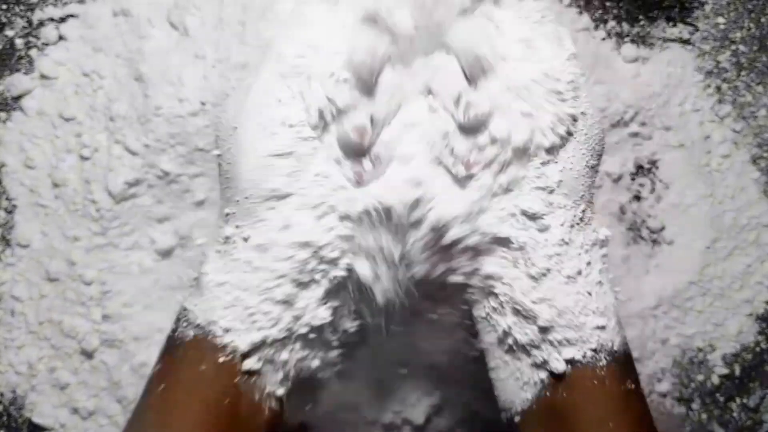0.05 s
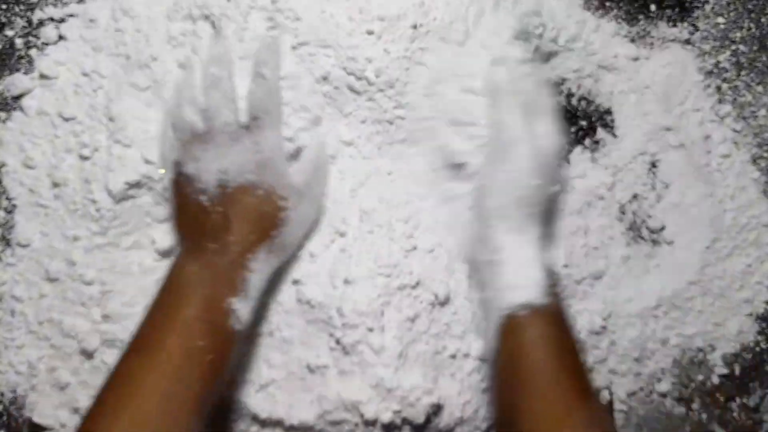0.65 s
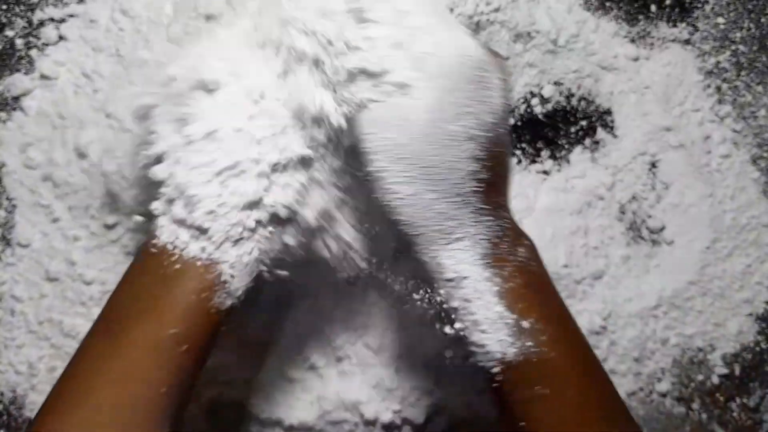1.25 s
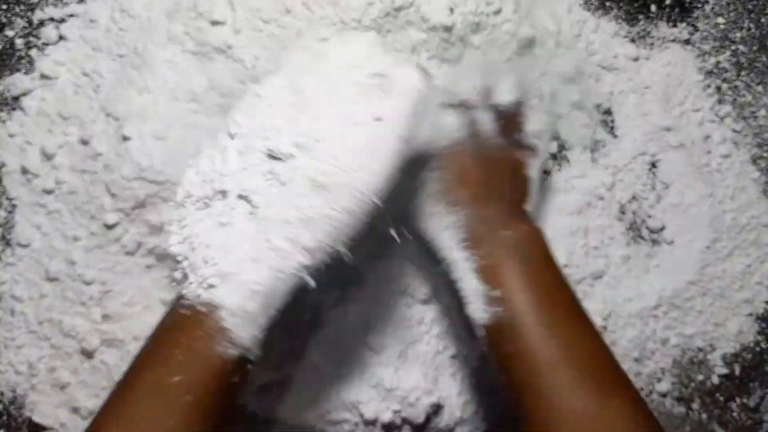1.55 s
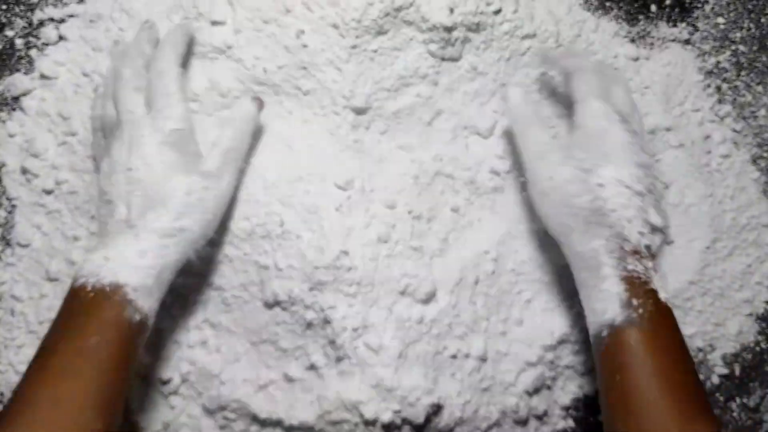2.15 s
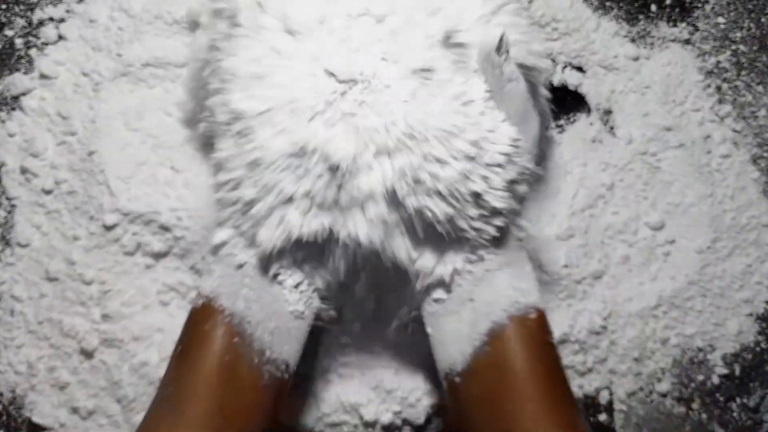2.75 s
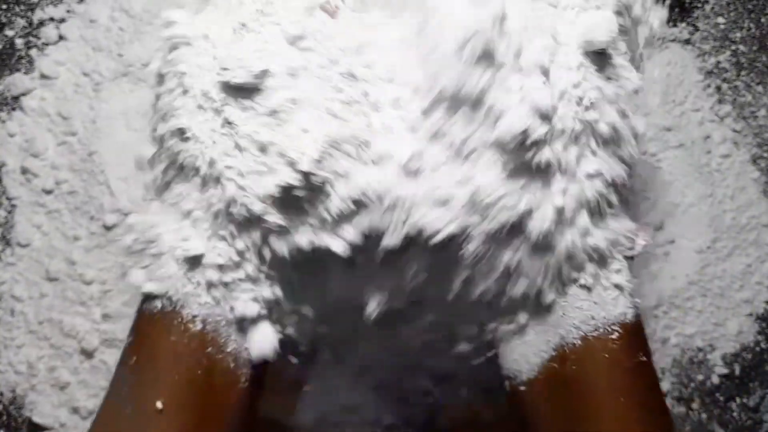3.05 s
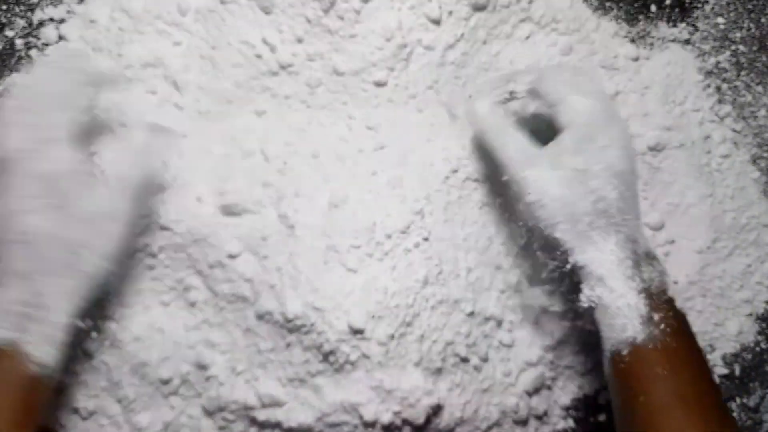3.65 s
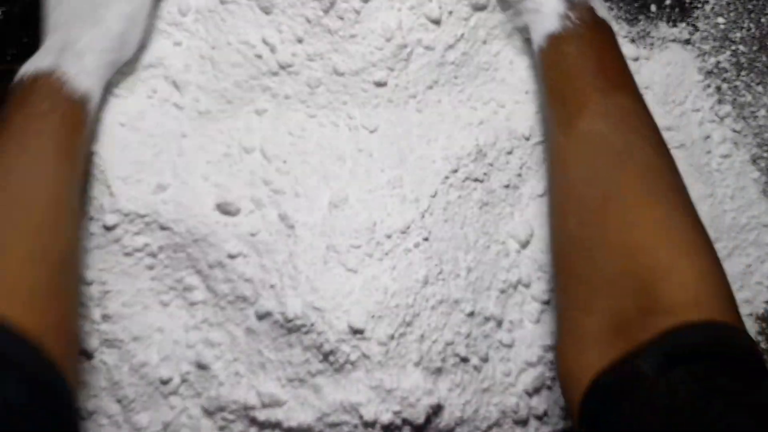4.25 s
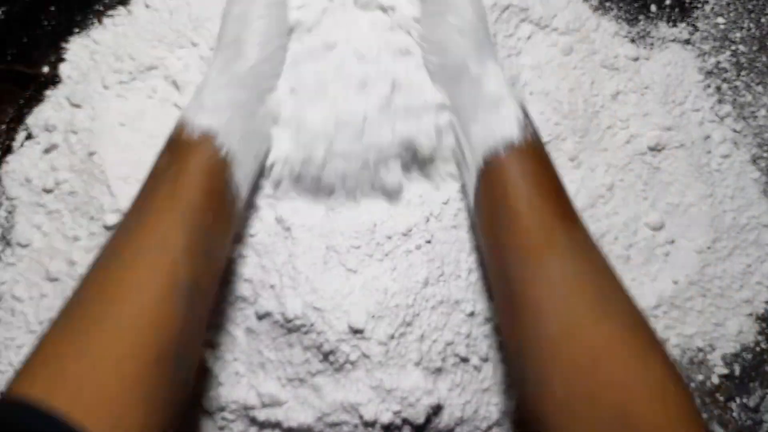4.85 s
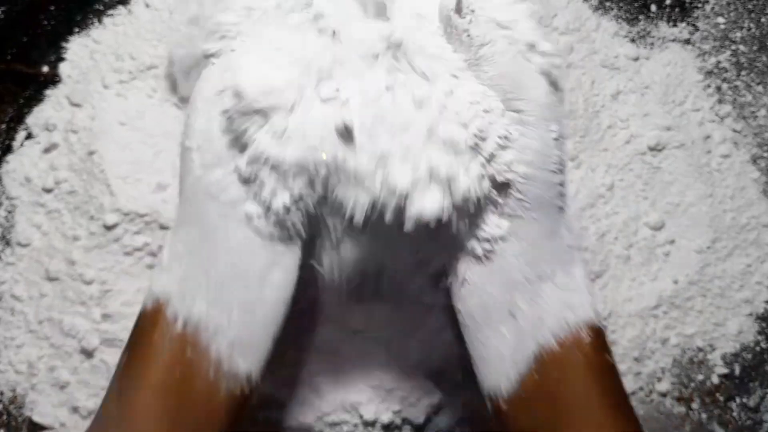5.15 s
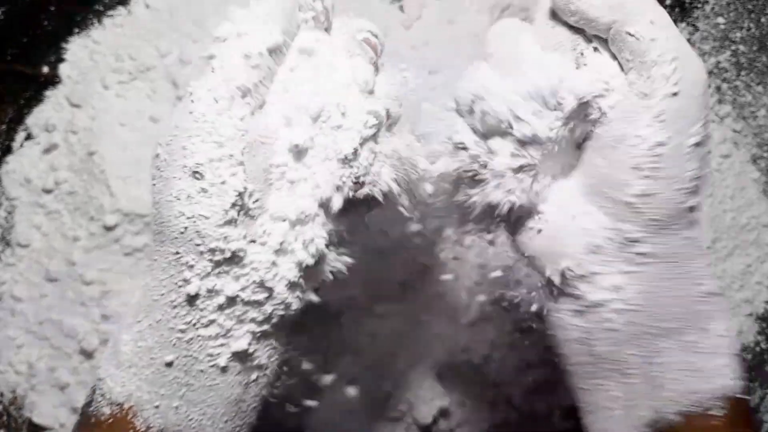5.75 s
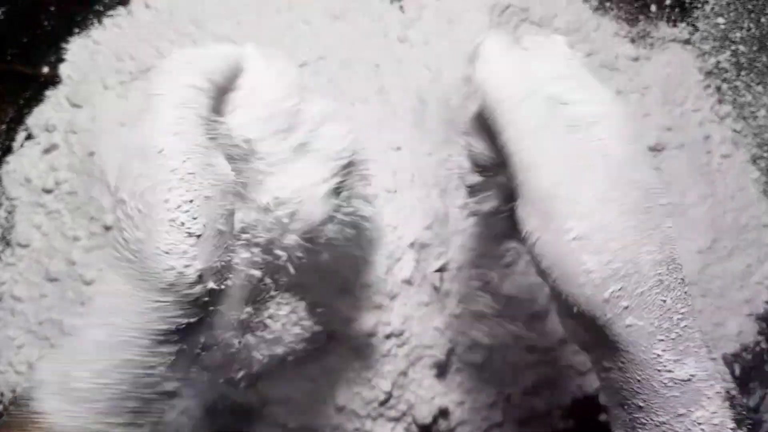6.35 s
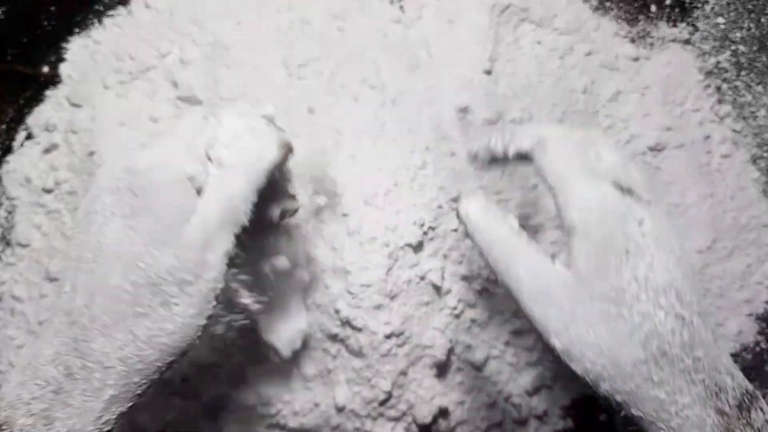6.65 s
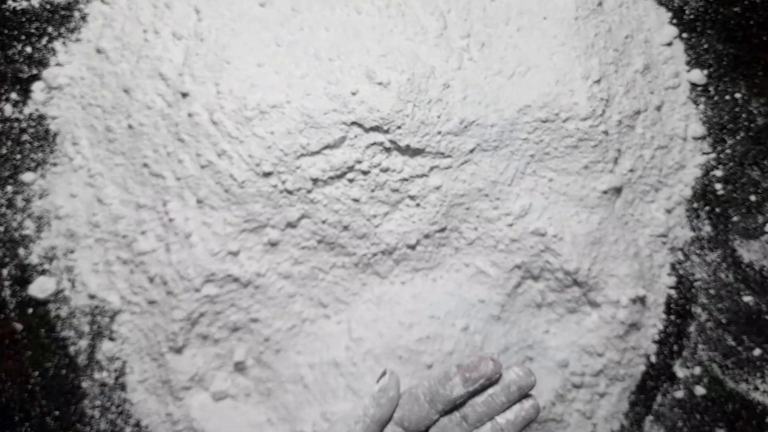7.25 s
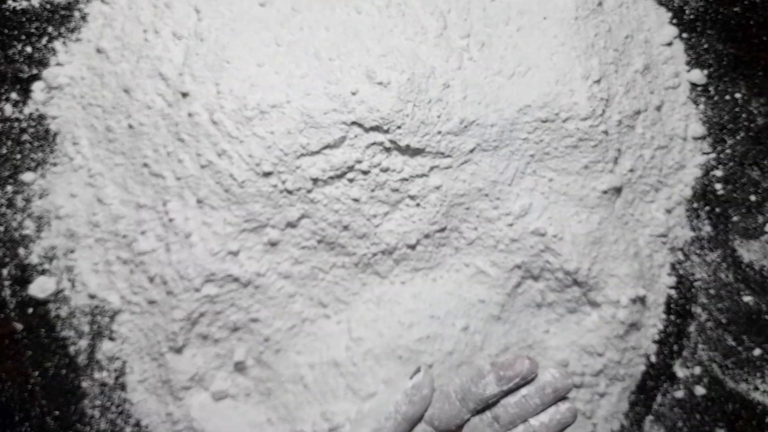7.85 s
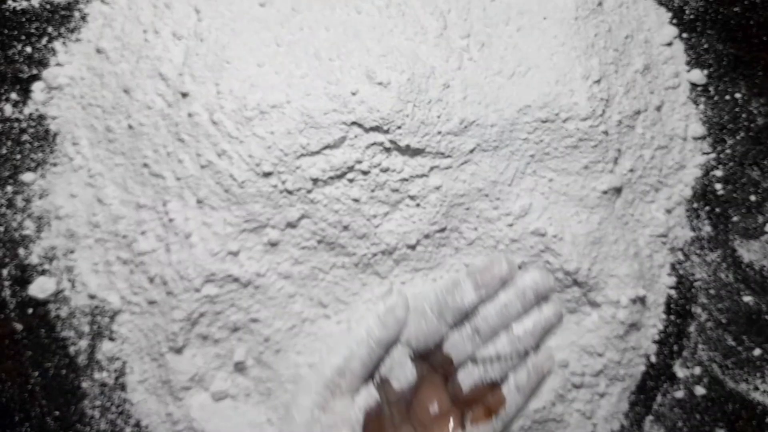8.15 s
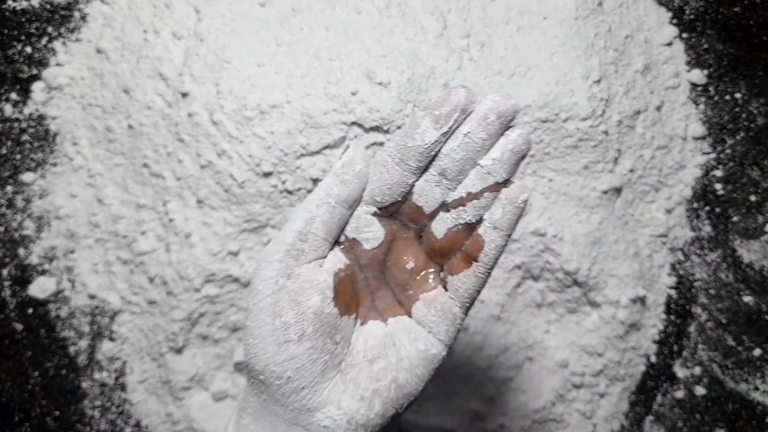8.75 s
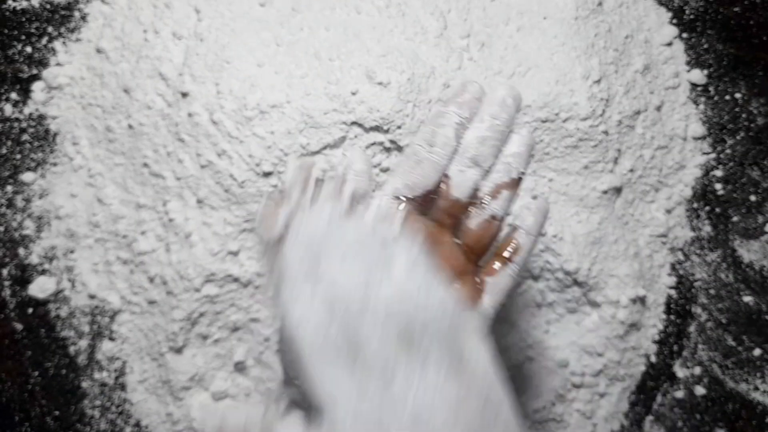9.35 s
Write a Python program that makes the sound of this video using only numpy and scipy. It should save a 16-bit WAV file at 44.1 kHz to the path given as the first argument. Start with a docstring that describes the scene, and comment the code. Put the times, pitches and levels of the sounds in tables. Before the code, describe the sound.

A steady fan hum and low rush of air fill a room while small birds chirp and cheep nearby. In front, very close, handfuls of loose chalk powder crunch, hiss and fall back in soft clumps with tiny snaps. The handling eases after one dry pop, three faint hollow knocks follow, and the powdery palms finally rub together.

```python
"""Chalk powder, scooped, squeezed and dropped on its heap by two hands close to the microphone. Dust hisses
along the skin; crumbs snap, fall and land in soft lumps; at the end the palms rub together. A machine, probably
a three-bladed fan, drones throughout in shaft harmonics over a rush of air. Small birds chirp in an echoing
space nearby. Late on the sound jumps in one sharp, dry click, and three light, hollow knocks follow."""
import sys
import numpy as np
from scipy import signal
from scipy.fft import rfft, irfft, next_fast_len
from scipy.io import wavfile

SR = 44100
rng = np.random.default_rng(int(sys.argv[2]) if len(sys.argv) > 2 else 0)


def generate_wav(sig):
    """Save sig (samples, or channels by samples) to the path in sys.argv[1] as 16-bit PCM at SR."""
    pcm = np.round(np.clip(np.atleast_2d(sig).T, -1, 1) * 32767).astype(np.int16)
    wavfile.write(sys.argv[1], SR, pcm)


N = 414099
TIME_S = np.arange(N) / SR

# left-right likeness (frequency [Hz], correlation [0-1])
STEREO_CORRELATION = [(50, 1), (130, 0.52), (250, 0.57), (500, 0.78), (1000, 0.09), (2000, 0), (16000, 0)]
# echo decay (frequency [Hz], T60 [s])
ROOM_T60 = [(200, 0.41), (1500, 0.63), (4500, 0.81), (7000, 0.46), (14000, 0.88)]

# fan speed (time [s], blade rate [Hz])
BLADE_RATE = [(0, 21.32), (2, 21.33), (3.7, 21.26), (5.8, 21.17), (7.6, 21.25), (9.39, 21.3)]
# steady fan lines (frequency [x shaft rate])
FAN_ORDERS = [7, 15, 16, 17, 20, 24, 27, 33, 39, 42, 57, 63]
# the same lines (level [dB])
FAN_ORDERS_DB = [-43, -38, -41, -34, -40, -29.5, -38.5, -41, -47.5, -50, -46, -49.5]
# moving room air (frequency [Hz], density [dB])
RUMBLE_SPECTRUM = [(28, -39.5), (47, -12), (58, -13), (125, -0.5), (170, -3), (310, -15), (430, -12.5),
                   (560, -22), (900, -30), (1700, -35.5), (2350, -43), (3000, -60.5), (6500, -61.5),
                   (16000, -59)]

# powder over skin, or palm over palm (peak time [s], rise [s], fall [s], level [dB])
RUBS = [(.04, 0.11, .22, -52), (.35, 0.21, 0.16, -53.5), (.99, 0.028, .09, -54), (1.24, 0.18, .38, -54),
        (1.58, 0.021, 0.064, -46), (1.9, .2, .09, -56.5), (2.22, .025, 0.099, -55.5),
        (2.8, 0.1, 0.19, -52.5), (3.3, 0.34, 0.21, -47), (4.2, 0.31, 0.74, -50.5),
        (5.04, 0.026, 0.16, -52.5), (5.6, 0.17, 0.25, -47.5), (6.3, 0.47, 0.55, -52.5),
        (7.36, 0.011, 0.077, -62), (7.94, 0.042, 0.22, -60.5), (8.23, .04, .05, -56.5),
        (8.55, 0.25, 0.18, -63), (9.24, 0.085, 0.32, -44.5)]
# powder crumbling onto the heap (peak time [s], rise [s], fall [s], level [dB])
FALLS = [(.06, 0.07, 0.084, -39.5), (.37, 0.14, 0.058, -37), (.58, 0.027, .2, -42),
         (1.26, 0.14, 0.33, -41.5), (1.59, 0.059, 0.1, -36.5), (1.88, .12, 0.13, -48),
         (2.22, 0.18, 0.4, -44.5), (2.86, 0.054, 0.13, -35.5), (3.16, 0.14, 0.23, -38),
         (3.37, 0.31, 0.21, -35), (4.35, 0.28, .35, -50.5), (4.9, 0.26, 0.092, -47),
         (5.25, 0.37, 0.38, -45.5), (5.64, 0.23, 0.24, -39), (6.25, 0.82, 0.92, -45.5),
         (9.25, 0.37, .3, -54)]
# hands ploughing the heap (peak time [s], rise [s], fall [s], level [dB])
SCOOPS = [(.68, 0.098, 0.11, -49), (2.46, .16, 0.099, -49.5), (4.28, .23, 0.38, -40.5),
          (4.78, 0.2, 0.078, -49)]
# breaking crumbs (frequency [Hz], density [dB])
CRUMBLE_SPECTRUM = [(60, 4), (150, 1.5), (330, 10.5), (600, 1.5), (900, 1), (1500, -2), (2400, -7),
                    (4200, -10), (6500, -18), (10000, -25.5), (16000, -41)]
# dust on skin (frequency [Hz], density [dB])
SLIDE_SPECTRUM = [(400, -17.5), (1500, -10.5), (3000, 1.5), (5000, 6), (7500, 2), (10200, -3), (12500, -1),
                  (14300, -3.5), (16000, -27)]
# airy hiss of scooping (frequency [Hz], density [dB])
SCOOP_SPECTRUM = [(400, -23.5), (3000, -6), (5000, -5.5), (8000, -2), (10000, -5), (12300, 4),
                  (14500, -0.5), (16000, 0)]
# air displaced by falling powder (frequency [Hz], density [dB])
DRAUGHT_SPECTRUM = [(25, -25), (45, -1), (65, -2), (110, -21.5), (300, -47)]

# falling bird calls (time [s], first pitch [Hz], last pitch [Hz], level [dB])
CHIRPS = [(.01, 4680, 3500, -41), (.5, 5230, 3935, -37.5), (.93, 4955, 3790, -40),
          (1.59, 4810, 3420, -42.5), (1.852, 5070, 3720, -40.5), (2.104, 5250, 3570, -42),
          (2.665, 5010, 3890, -40.5), (4.64, 4750, 3710, -39.5), (5.58, 4960, 3650, -41),
          (6.561, 4900, 3650, -40), (7.47, 5060, 4080, -47.5), (8.101, 5800, 4290, -49),
          (8.466, 5070, 4420, -39), (8.91, 5080, 4220, -52)]
# held bird calls (time [s], length [s], pitch [Hz], level [dB])
CHEEPS = [(1.077, .064, 5700, -42.5), (2.805, 0.2, 5960, -46.5), (3.096, 0.048, 4630, -37.5),
          (3.25, 0.09, 4690, -37), (3.755, 0.14, 4600, -37), (3.935, 0.089, 4220, -39),
          (5.05, 0.15, 6560, -49), (6.11, .12, 5960, -44), (6.949, 0.084, 5010, -40.5),
          (6.957, 0.073, 5840, -36), (7.019, 0.083, 4440, -36.5), (7.075, 0.035, 5700, -38.5),
          (7.341, .035, 8100, -51), (8.46, 0.058, 6240, -46.5), (9.047, 0.063, 5780, -36.5),
          (9.102, 0.1, 4630, -37.5), (9.182, 0.054, 5850, -40)]
# cheep trill, least at mid-range (pitch [Hz], nominal depth [Hz])
CHEEP_TRILL = [(4500, 500), (5850, 170), (6300, 420), (8100, 800)]
# one thin whistle (time [s], length [s], pitch [Hz], nominal trill depth [Hz], level [dB])
WHISTLE = (8.125, .12, 4996.5, 35, -50.5)

# landing lumps and soft pats (time [s], level [dB], thud pitch [Hz])
LUMPS = [(0.07, -28, 1000), (.223, -27, 1300), (.367, -27, 1600), (0.564, -22.5, 654), (1.578, -13, 1190),
         (1.584, -18, 580), (1.602, -18, 380), (1.856, -23, 1040), (1.904, -27, 800), (2.21, -27, 1300),
         (2.847, -17, 1480), (3.119, -22, 1210), (3.159, -21, 344), (3.289, -23, 930), (3.353, -25, 328),
         (3.423, -14.5, 945), (3.444, -16, 374), (5.408, -31, 800), (5.471, -26.5, 1000),
         (6.4383, -27.5, 1200)]
# spill from a lump of pitch SPILL_REF_HZ (frequency [Hz], density [dB])
SPILL_SPECTRUM = [(80, -5), (300, -3), (700, 11.5), (1050, -9), (1500, 6.5), (2200, -12), (3600, -15),
                  (6000, -39), (15000, -31)]
SPILL_REF_HZ, SPILL_REF_DB = 1100, -29.5
# crumbs snapping (time [s], level [dB])
SNAPS = [(0.3531, -31), (0.9786, -37), (1.5775, -19.5), (1.921, -29), (2.2034, -32), (2.8467, -27),
         (3.013, -30), (3.0462, -27.5), (3.4416, -30.5), (3.6272, -32), (5.0294, -28), (5.1728, -28.5),
         (5.6441, -27.5), (6.5884, -34.5), (7.3462, -33.5)]
# one snap (frequency [Hz], density [dB])
SNAP_SPECTRUM = [(600, -22.5), (2000, 0.5), (4000, 5.5), (8000, 1.5), (10000, -2.5), (12500, 1),
                 (16000, -12)]

# light knocks (time [s], level [dB], pitch [ratio])
KNOCKS = [(7.347, -31.5, 0.75), (7.918, -25.5, 0.92), (8.379, -31, 0.7)]
# hollow body (frequency at ratio 1 [Hz], level [dB], T60 [s])
HOLLOW_MODES = [(520, -8.5, .04), (780, -3, 0.033), (1304, -3, 0.047), (1520, 4, 0.018), (1740, 1, 0.029),
                (1965, 4, 0.018), (2530, -9.5, 0.031)]


def gain(db):
    """Decibels to amplitude."""
    return 10 ** (np.asarray(db) / 20)


def unit_rms(x):
    """Scale to RMS 1."""
    return x / np.sqrt(np.mean(x ** 2) + 1e-20)


def lookup(table, hz):
    """Interpolate over log frequency."""
    table_hz, values = np.transpose(table)
    return np.interp(np.log(hz + 1), np.log(table_hz + 1), values)


def add(mix, start_s, sound):
    """Mix in a sound at start_s."""
    part = mix[..., max(round(start_s * SR), 0):][..., :sound.shape[-1]]
    part += sound[..., :part.shape[-1]]


def wander(rate_hz):
    """Smooth random drift, RMS 1."""
    size = next_fast_len(N)
    lowpass = np.exp(-(np.fft.rfftfreq(size, 1 / SR) / rate_hz) ** 2)
    return unit_rms(irfft(rfft(rng.standard_normal(size)) * lowpass, size)[:N])


def colour(x, spectrum, shift=1, size=8192):
    """Minimum-phase filter of unit energy; shift scales its frequencies."""
    hz = abs(np.fft.fftfreq(size, 1 / SR))
    log_gain = np.log(gain(lookup(spectrum, hz / shift)))
    response = np.exp(np.conj(signal.hilbert(log_gain)))
    taps = np.fft.ifft(response).real[:size // 2]
    return signal.oaconvolve(x, taps[None] / np.linalg.norm(taps), axes=1)[:, :x.shape[1]]


def mic_pair(x):
    """Two unrelated signals to stereo: alike in the bass, apart in the treble."""
    size = next_fast_len(x.shape[1])
    a, b = rfft(x, size)
    correlation = np.clip(lookup(STEREO_CORRELATION, np.fft.rfftfreq(size, 1 / SR)), 0, 1)
    mid, side = a * np.sqrt((1 + correlation) / 2), b * np.sqrt((1 - correlation) / 2)
    return irfft(np.array([mid + side, mid - side]), size)[:, :x.shape[1]]


def noise(samples=N):
    """White noise at the microphone pair."""
    return mic_pair(rng.standard_normal((2, samples)))


def burst(decay_s):
    """Noise with instant onset and exponential decay."""
    t = np.arange(SR // 4) / SR
    return noise(len(t)) * np.exp(-t / decay_s)


def grains(per_s, spread_db):
    """Tiny random impacts of uneven size."""
    sizes = gain(spread_db * np.minimum(rng.exponential(1, (2, N)), 5))
    signs = rng.choice([-1, 1], (2, N))
    hits = rng.random((2, N)) < per_s / SR
    return unit_rms(sizes * signs * hits)


def movements(rows, rest_db=-120, flank_db=-9.5):
    """Hand movement envelopes, summed in power; rise and fall are times from the peak to flank_db."""
    t = TIME_S[::64]
    power = gain(rest_db) ** 2
    for peak_s, rise_s, fall_s, db in rows:
        distance = np.maximum((peak_s - t) / rise_s, (t - peak_s) / fall_s)
        power = power + gain(db + flank_db * distance ** 1.5) ** 2
    return np.interp(TIME_S, t, np.sqrt(power))


def fan(blades=3, swell_peak_s=5.77, swell_half_width_s=2.78):
    """Phase-locked shaft harmonics throb. In one slow swell, blade harmonic 6 grows and 7 gives way."""
    blade_hz = np.interp(TIME_S, *np.transpose(BLADE_RATE))
    shaft_rad = 2 * np.pi * (np.cumsum(blade_hz) / (blades * SR) + rng.random())
    swell = np.exp(-((TIME_S - swell_peak_s) / swell_half_width_s) ** 2)
    sixth_db = -23 + 7.6 * swell + 1.27 * (1 - swell / 2) * wander(2.1)
    seventh_db = -28.5 - 9.5 * swell + 2.5 * wander(3.3)
    lines = [(6 * blades, sixth_db), (7 * blades, seventh_db), *zip(FAN_ORDERS, FAN_ORDERS_DB)]
    drone = sum(gain(db) * np.sqrt(2) * np.cos(order * shaft_rad) for order, db in lines)
    waver = 1 + 0.045 * wander(8.1)
    return drone * waver * gain([[-.6], [.6]])


def rumble(level_db=-28):
    """Steady rush of moving room air."""
    return gain(level_db) * colour(noise(), RUMBLE_SPECTRUM) * gain([[-.7], [.7]])


def powder(clumping_db=2.5, stutter_db=1.1):
    """Crumbs break and land in clumps; dust hisses on skin, airier where hands plough the heap."""
    fine = gain(4.5) * grains(per_s=5000, spread_db=2.0)
    coarse = gain(-2) * grains(per_s=110, spread_db=3.3)
    crumbs = colour(mic_pair(fine + coarse), CRUMBLE_SPECTRUM)
    grit = gain(-9) * grains(per_s=64, spread_db=-0.5)
    on_skin = colour(grains(per_s=11000, spread_db=4.5) + grit, SLIDE_SPECTRUM)
    in_heap = colour(grains(per_s=20000, spread_db=-0.5), SCOOP_SPECTRUM) * gain([[-1], [1]])
    rubbing = gain(5) * movements(RUBS, rest_db=-71)
    scooping = gain(4) * movements(SCOOPS)
    dust = rubbing * on_skin + np.hypot(scooping, gain(-7) * rubbing) * in_heap
    crumbs *= movements(FALLS, rest_db=-60) * gain(clumping_db * wander(35))
    dust *= gain(stutter_db * wander(80))
    return (crumbs + dust) * gain([[-.5], [.5]])


def draught(gain_db=-2):
    """Falling powder pushes a deep puff of air at the microphone."""
    return gain(gain_db) * colour(noise(), DRAUGHT_SPECTRUM) * movements(FALLS)


def birds(trill_hz=100, rasp=0.543, octave_db=-27, steepness=4.59, trill_drive=0.74):
    """Falling chirps, held cheeps and one whistle, each with a fast, uneven trill and a faint octave."""
    out = np.zeros(N)
    trill_rad = 2 * np.pi * np.cumsum(trill_hz * (1 + .25 * wander(40.66))) / SR
    trill = unit_rms(np.sin(trill_rad) + rasp * wander(560))

    def call(start_s, length_s, first_hz, depth_hz, db, end_ratio=1):
        """Add one note; pitch glides on an S-curve towards end_ratio."""
        samples = int(length_s * SR)
        glide = (1 + np.tanh(steepness * np.linspace(-.5, .5, samples))) / 2
        swing = np.tanh(trill_drive * trill[int(start_s * SR):][:samples]) / np.sqrt(trill_drive)
        hz = first_hz * (1 + (end_ratio - 1) * glide) + depth_hz * swing
        phase = 2 * np.pi * np.cumsum(hz) / SR
        tone = np.sin(phase) + gain(octave_db) * np.sin(2 * phase)
        add(out, start_s, gain(db) * unit_rms(tone * signal.windows.tukey(samples, .5)))

    for start_s, hz, last_hz, db in CHIRPS:
        call(start_s, length_s=.12, first_hz=hz, depth_hz=490, db=db, end_ratio=last_hz / hz)
    for start_s, length_s, hz, db in CHEEPS:
        call(start_s, length_s, hz, lookup(CHEEP_TRILL, hz), db)
    call(*WHISTLE)
    return out[None]


def lumps(attack_s=0.0001, decay_cycles=0.88, spill_db=-13, spill_ref_s=0.012, doubling_db=17):
    """Packed powder thuds, then spills. Bigger lumps sound lower; deep or hard landings spill longer."""
    out, t = np.zeros((2, N)), np.arange(SR // 20) / SR
    for start_s, db, hz in LUMPS:
        envelope = (1 - np.exp(-t / attack_s)) * np.exp(-t * hz / decay_cycles)
        detune = rng.uniform(0.98, 1.07, (2, 1))
        thud = 2 * envelope * np.sin(2 * np.pi * hz * t * detune)
        decay_s = spill_ref_s * SPILL_REF_HZ / hz * 2 ** ((db - SPILL_REF_DB) / doubling_db)
        spill = colour(burst(decay_s), SPILL_SPECTRUM, shift=hz / SPILL_REF_HZ)
        add(out, start_s, gain(db) * thud)
        add(out, start_s, gain(db + spill_db) * spill)
    return out


def snaps(gain_db=-1):
    """Single hard crumbs crack between the fingers."""
    out = np.zeros((2, N))
    for start_s, db in SNAPS:
        add(out, start_s, gain(db + gain_db) * colour(burst(decay_s=0.0023), SNAP_SPECTRUM))
    return out


def pop(start_s=6.9418, level_db=-11, decay_s=0.0063):
    """One dry pop: a sudden step that sinks back."""
    out, t = np.zeros(N), np.arange(SR // 10) / SR
    add(out, start_s, gain(level_db) * np.exp(-t / decay_s))
    return out


def knocks(attack_s=0.00045):
    """Soft blows briefly ring something hollow, perhaps a water container."""
    out, t = np.zeros((2, N)), np.arange(SR // 8) / SR
    attack = 1 - np.exp(-t / attack_s)
    for start_s, db, pitch_ratio in KNOCKS:
        for hz, mode_db, t60_s in HOLLOW_MODES:
            ring = np.sin(2 * np.pi * (hz * pitch_ratio * t + rng.random((2, 1)) / 2))
            add(out, start_s, gain(db + mode_db - 60 * t / t60_s) * ring * attack)
    return out


def room(x, build_s):
    """Diffuse echo: builds up, then decays at each band's own rate."""
    hz, t, bands = signal.stft(rng.standard_normal((2, SR)), SR, nperseg=256)
    envelope = (1 - np.exp(-t / build_s)) * gain(-60 * t / lookup(ROOM_T60, hz)[:, None])
    tail = signal.istft(bands * envelope, SR)[1]
    return signal.fftconvolve(x, tail / np.linalg.norm(tail[0]), axes=1)[:, :N]


def scene():
    """Hands near and fairly dry, birds mostly echo, fan and rumble beneath."""
    hands = powder() + lumps() + snaps() + knocks()
    song = birds()
    near = hands + gain(-6.5) * room(hands, build_s=0.0026)
    far = gain(-8.5) * song + gain(-0.9) * room(song, build_s=0.011)
    return fan() + rumble() + draught() + pop() + near + far


def record(dry):
    """Steep low-pass band limit."""
    cutoff_hz = 15900
    taps = signal.firwin(511, cutoff_hz, window=("kaiser", 9), fs=SR)
    return signal.oaconvolve(dry, taps[None], "same")


dry = scene()
out = record(dry)
generate_wav(out)
```